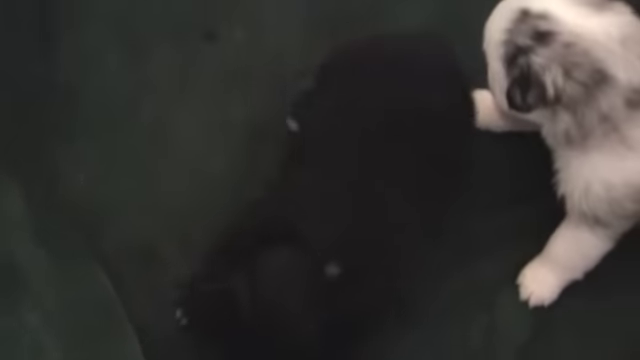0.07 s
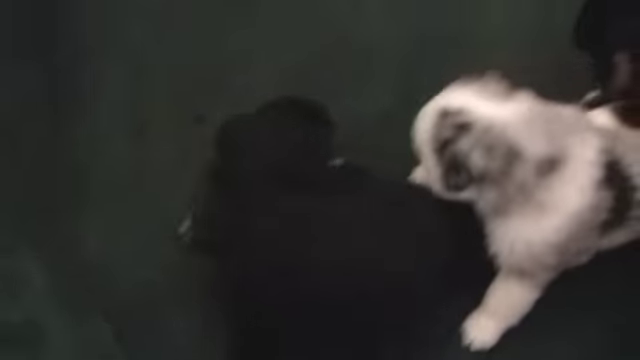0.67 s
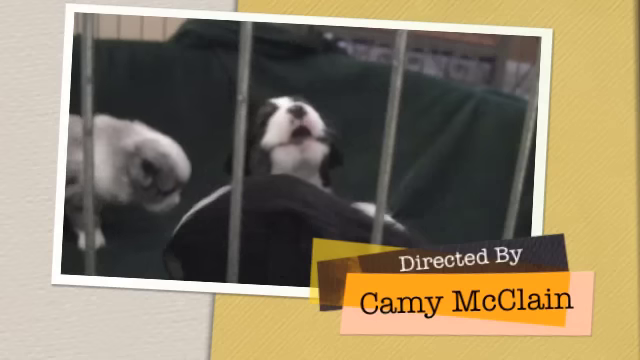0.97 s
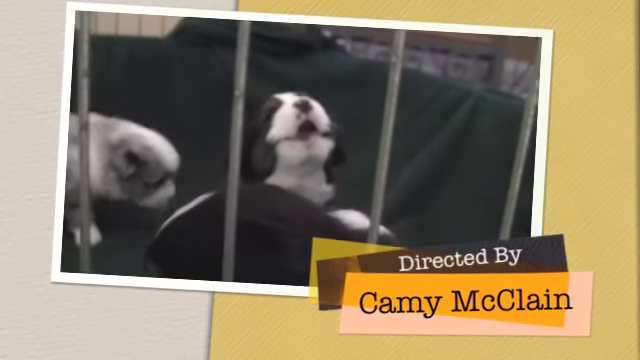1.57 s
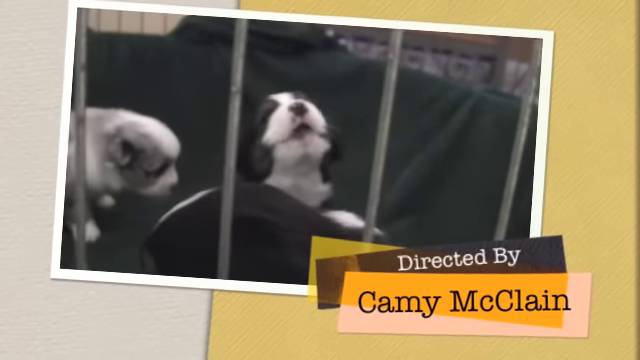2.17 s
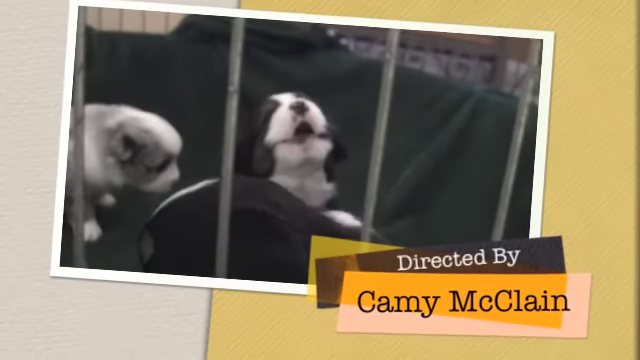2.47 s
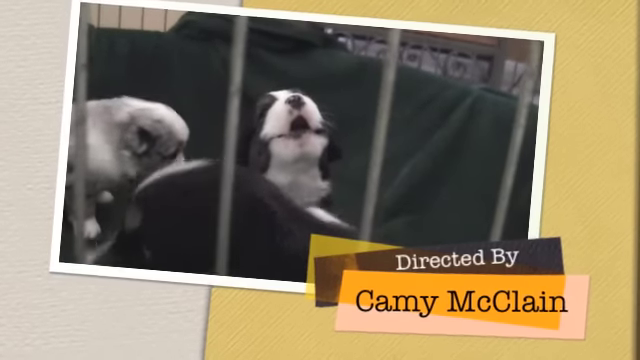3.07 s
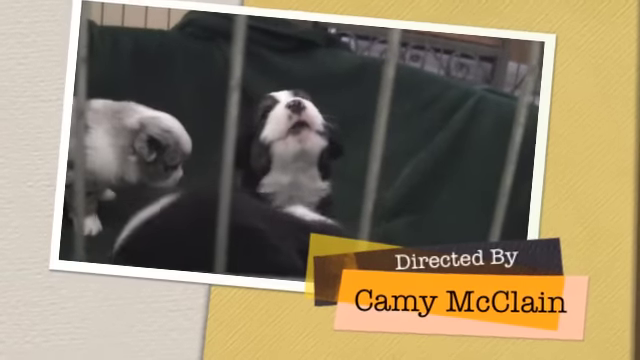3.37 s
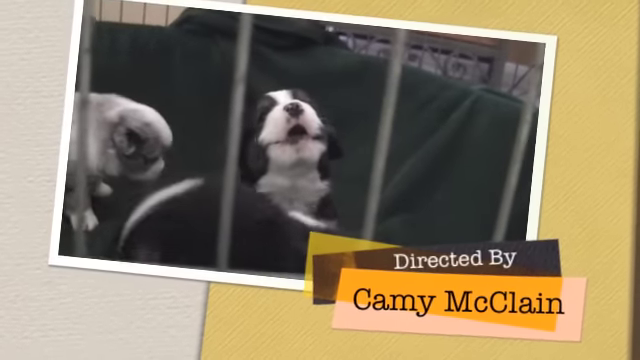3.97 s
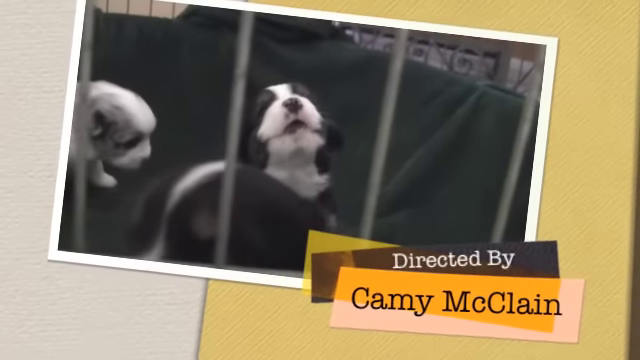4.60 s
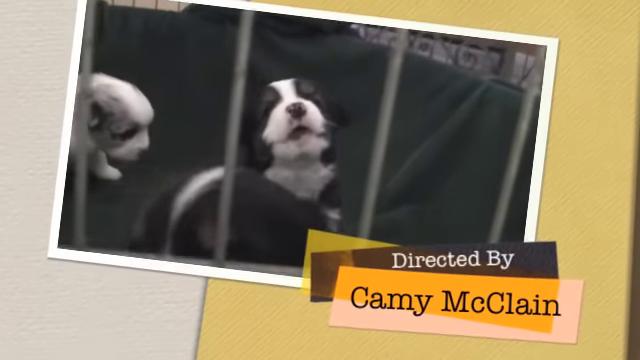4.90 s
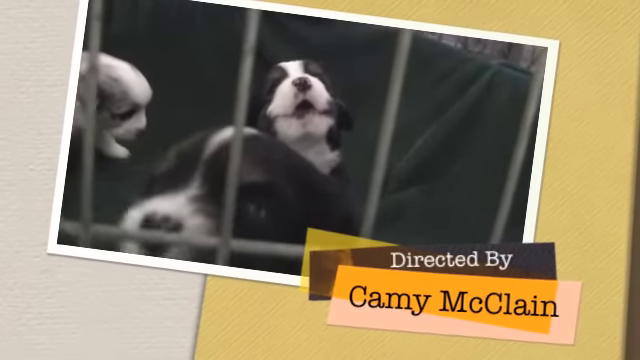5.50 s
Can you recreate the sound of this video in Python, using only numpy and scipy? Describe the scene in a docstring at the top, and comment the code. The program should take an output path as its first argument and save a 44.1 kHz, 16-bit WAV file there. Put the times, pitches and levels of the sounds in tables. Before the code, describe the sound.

Two puppies cry close to the microphone in a quiet indoor pen. A brief hush gives way to a breathy whimper, then one puppy lets out four howls, each a raspy yelp that breaks upward into a clear, high note. The second puppy overlaps with three thin, wavering whines. Paws pad and scuff lightly now and then, and the near walls add a short echo over faint room noise.

```python
"""A small indoor pen: two puppies cry after a second of near silence.
One whimpers, then howls four times: a rough yelp, a climb in the low register, a crack, a high wail.
Its vocal fold harmonics pass the throat and a mouth resonance that moves with the jaw.
A littermate whines along on a thin, almost pure tone. Paws scuff; the walls answer with a short ring."""
import sys
import numpy as np
from scipy import signal
from scipy.fft import rfft, irfft
from scipy.io import wavfile
from scipy.ndimage import uniform_filter1d, minimum_filter1d

SR = 44100
rng = np.random.default_rng(int(sys.argv[2]) if len(sys.argv) > 2 else 0)


def wrap_up_sound(samples):
    """Save the sound to the file named by the first command line argument, as 16-bit audio."""
    columns = np.atleast_2d(samples).T
    # keep every value between -1 and 1, then stretch to whole-number steps
    tamed = np.clip(columns, -1, 1)
    steps = np.round(tamed * 32767).astype(np.int16)
    wavfile.write(sys.argv[1], SR, steps)


N = 248928
TIME_S = np.arange(N) / SR


def amp(db):
    """Decibels to gain."""
    return 10 ** (np.asarray(db) / 20)


def unit_rms(x):
    """Scales to rms 1."""
    return x / np.sqrt(np.mean(x ** 2) + 1e-20)


def at_hz(points, hz):
    """Interpolates a table on a log-frequency axis."""
    point_hz, value = np.transpose(points)
    return np.interp(np.log(hz + 1), np.log(point_hz + 1), value)


def curves(rows):
    """Sample times of a table, then each column at those times."""
    times_s, *columns = np.transpose(rows)
    t = np.arange(times_s[0], times_s[-1], 1 / SR)
    return [t] + [np.interp(t, times_s, column) for column in columns]


def add(mix, start_s, sound):
    """Mixes a sound in at start_s."""
    part = mix[max(round(start_s * SR), 0):][:len(sound)]
    part += sound[:len(part)]


def noise(spectrum, size):
    """Shaped noise of rms 1."""
    gain = amp(at_hz(spectrum, np.fft.rfftfreq(size, 1 / SR)))
    return unit_rms(irfft(rfft(rng.standard_normal(size)) * gain, size))


def waver(corner_hz, size):
    """Low-passed random motion of rms 1."""
    hz = np.fft.rfftfreq(size, 1 / SR)
    gain = (hz > 0) / (1 + (hz / corner_hz) ** 2) ** 2
    return unit_rms(irfft(rfft(rng.standard_normal(size)) * gain, size))


def fade(t, rise_s, fall_s):
    """Linear fade in and out."""
    return np.clip((t - t[0]) / rise_s, 0, 1) * np.clip((t[-1] - t) / fall_s, 0, 1)


# Room noise before, then during the crying. Each row: frequency in Hz, relative level in dB.
HUSH_SPECTRUM = [(30, -28), (120, -4.5), (300, -6.5), (1000, -11), (8000, -27.5), (15000, -45.5)]
AIR_SPECTRUM = [(25, -14), (60, -12), (150, -5), (300, -5), (600, -7.5), (1200, -1.5), (2500, -14.5),
                (4500, -21.5), (8000, -25), (15000, -35)]

def room_noise(hush_db=-70, air_db=-49.5, air_start_s=1, width=0.3):
    """A hush gives way to louder room noise as the crying starts."""
    def stereo(spectrum):
        return noise(spectrum, N) + width * np.array([[1], [-1]]) * noise(spectrum, N)
    hush = amp(hush_db) * stereo(HUSH_SPECTRUM) * np.interp(TIME_S, [0.9, 0.97], [1, 0.1])
    air = amp(air_db) * stereo(AIR_SPECTRUM) * np.clip((TIME_S - air_start_s) / 0.0059, 0, 1)
    return hush + air


# Opening hum. Each row: time in seconds, pitch in Hz, level in dB.
HUM_CONTOUR = [(0, 136, -66), (.12, 133, -63), (.21, 131.8, -67), (.45, 124, -84), (.55, 110.3, -76),
               (.94, 103.5, -73)]

def hum(octave_db=-13.5):
    """A faint low tone and its octave, stepping down in pitch."""
    t, hz, level_db = curves(HUM_CONTOUR)
    phase = 2 * np.pi * np.cumsum(hz) / SR
    tone = np.sin(phase) + amp(octave_db) * np.sin(2 * phase)
    track = np.zeros(N)
    add(track, t[0], np.sqrt(2) * amp(level_db) * tone)
    return track


# Ring of the room. Each row: frequency in Hz, T60 in seconds.
WALL_T60 = [(200, 0.52), (1200, 0.22), (3000, 0.36), (8000, 0.33)]

def wall_reflections(x, wet_db=-14, gap_s=0.0043):
    """Dense reflections from the near walls, the bass lasting longest."""
    t = np.arange(SR // 2) / SR
    taps = rng.standard_normal((2, len(t))) * (rng.random((2, len(t))) < 0.1) * (t > gap_s)
    taps = taps + 0.5 * taps[::-1]  # closely spaced microphones
    hz, age_s, frames = signal.stft(taps, SR, nperseg=256)
    decay = amp(-60 * age_s / at_hz(WALL_T60, hz)[:, None])
    tail = signal.istft(frames * decay, SR, nperseg=256)[1]
    tail /= np.sqrt(np.mean(abs(rfft(tail, SR)[:, 800:2000]) ** 2))  # unity gain over 800-2000 Hz
    return amp(wet_db) * signal.fftconvolve(x[None], tail, axes=1)[:, :N]


# Stereo balance. Each row: frequency in Hz, left minus right in dB.
BALANCE = [(600, 1.3), (1200, 0.5), (2000, 4.5), (3100, 0.5), (6400, 3), (9000, 6.5), (13000, -5.5)]
# Stereo phase. Each row: frequency in Hz, left lead in radians.
PHASE_LEAD = [(0, 0), (1200, 0.42), (3000, 1.21), (6400, 1.12), (9000, 1.3)]

def direct_path(x):
    """The straight path reaches two microphones at unequal level and phase."""
    hz = np.fft.rfftfreq(N, 1 / SR)
    left = amp(at_hz(BALANCE, hz) / 2) * np.exp(0.5j * at_hz(PHASE_LEAD, hz))
    pair = np.array([left, 1 / left])
    return irfft(rfft(x) * pair / abs(pair).mean(0), N)


# Steps and scuffs. Each row: start in seconds, level in dB, centre in Hz, decay in seconds.
PAW_STEPS = [(1.291, -42, 147.2, 0.095), (3.387, -26, 1723, 0.0049), (4.697, -31.5, 1516, 0.0036),
             (4.706, -42, 2170, 0.025), (5.33, -48, 216, 0.052)]

def paw(start_s, level_db, hz, decay_s):
    """A short noise burst: low for a padding step, high for a scuffing claw."""
    t = np.arange(SR // 3) / SR
    spectrum = [(hz / 3, -25), (hz, 0), (hz * 1.2, -5), (hz * 2, -28), (hz * 10, -70)]
    envelope = np.exp(-t / decay_s) * fade(t, 5 / hz, 0.01)
    return start_s, amp(level_db) * noise(spectrum, len(t)) * envelope


# Breath noise. Each row: frequency in Hz, relative level in dB.
BREATH_SPECTRUM = [(150, -28), (420, -4), (700, -8.5), (1300, 6.5), (2000, -14.5), (3200, -10.5),
                   (4300, -31), (6500, -17), (9000, -20), (15000, -38.5)]
# Breaths before the first two howls. Each row: start in seconds, length in seconds, level in dB.
GASP_EVENTS = [(1.026, 0.099, -28.5), (2.201, 0.098, -42)]

def gasp(start_s, length_s, level_db):
    """A quick rush of air through the open mouth."""
    progress = np.arange(round(length_s * SR)) / (length_s * SR)
    envelope = np.interp(progress, [0, 0.25, 1], [0, 1.3, 0.15])
    return start_s, amp(level_db) * noise(BREATH_SPECTRUM, len(progress)) * envelope


# The littermate's three whines. Each row: time in seconds, pitch in Hz, level in dB.
FIRST_WHINE = [(1.712, 926, -29), (1.76, 1007, -28.5), (1.937, 1114, -25), (2.01, 1143, -28),
               (2.059, 1066, -21), (2.144, 1063, -25), (2.172, 918, -36.5)]
SECOND_WHINE = [(2.41, 843, -32.5), (2.59, 1383, -23.5), (2.782, 1540, -23), (3.072, 1467, -13),
                (3.127, 1505, -16), (3.3, 1425, -20), (3.352, 1455, -19), (3.393, 1494, -13.5),
                (3.546, 1472, -8.5), (3.619, 1468, -23), (3.722, 1345, -24.5), (3.865, 1456, -20),
                (3.96, 1352, -37), (4.289, 1038, -37.5)]
THIRD_WHINE = [(4.819, 390.5, -35), (4.85, 413, -34), (4.89, 639.5, -18), (4.955, 1095, -20),
               (5.01, 1299, -17.5), (5.218, 1355, -18), (5.316, 1389, -22.5), (5.377, 1400, -25),
               (5.468, 914, -23.5), (5.559, 619, -29), (5.605, 716, -31)]
# Whine overtones. Each row: frequency in Hz, level in dB re the fundamental.
WHINE_SPECTRUM = [(1200, -6.5), (1900, -12), (2300, -26), (2750, -30), (3050, -36.5), (3450, -29.5),
                  (3900, -55), (6000, -38.5), (7400, -35.5), (8900, -35), (10300, -55.5), (14000, -60)]
# Push through the nose. Each row: time in seconds, treble and hiss gain in dB.
NASALITY = [(3.25, -7), (3.37, 0), (3.53, 2.5), (3.7, -22.5), (4.9, -8.5), (5.1, -2), (5.4, -5)]
# Nose hiss. Each row: frequency in Hz, relative level in dB.
NOSE_SPECTRUM = [(3000, -31), (5500, -12), (7500, -10), (9000, -5), (10000, -23), (15000, -35.5)]

def whine(contour, tremor=0.0037, hiss_db=-42):
    """A strong fundamental with thin overtones and a hiss from the nose."""
    t, hz, level_db = curves(contour)
    nasal_db = np.interp(t, *np.transpose(NASALITY))
    catch = 0.08 * np.exp(-hz / 415) * waver(40, len(t))  # the pitch catches when low
    unsteady_hz = hz * (1 + catch + tremor * waver(48, len(t)))
    phase = 2 * np.pi * np.cumsum(unsteady_hz) / SR
    order = np.arange(2, 7)[:, None]
    gains = amp(at_hz(WHINE_SPECTRUM, order * hz) + nasal_db * (order * hz > 4000))
    tone = np.cos(phase) + (gains * np.cos(order * phase)).sum(0)
    hiss = amp(hiss_db + nasal_db) * noise(NOSE_SPECTRUM, len(t))
    return t[0], np.sqrt(2) * amp(level_db) * (tone + hiss) * fade(t, 0.0028, 0.0074)


# The howler's unsteady pitch. Each row: time in seconds, offset in percent.
PITCH_DRIFT = [(1.53, .5), (1.61, -.8), (1.8, -0.43), (1.878, 1.5), (1.958, -0.5), (3.0, 0.54),
               (3.056, -1.6), (3.196, 0.5), (3.55, -0.5), (3.751, 0), (3.817, -3.1), (3.932, 3),
               (4.018, -1), (4.205, 0.3), (4.307, -0.5), (4.406, 1), (4.45, 0)]

def voice(t, hz, level_db, mouth_hz, bright_db, edge_db, roughness, throat,
          attack_s=0.0014, mouth_width_hz=180, flutter=0.059, rasp_db=-10, breath_db=-20):
    """The howler's vocal fold harmonics, filtered by the throat and one mouth resonance."""
    size = len(t)
    hz = hz * (1 + np.interp(t, *np.transpose(PITCH_DRIFT)) / 100)
    level_db = level_db + 13 * roughness * waver(24, size)
    jitter = 0.074 * roughness * waver(130, size)
    tremor = 0.0037 * waver(90, size)
    phase = 2 * np.pi * np.cumsum(hz * (1 + jitter + tremor)) / SR
    order = np.arange(1, 29)[:, None]
    harmonic_hz = order * hz
    # Vocal effort sets the overtones: brightness from 1.4 kHz up, edge from 4 kHz up.
    effort_db = bright_db * np.interp(harmonic_hz, [1400, 3000], [0, 1])
    effort_db += edge_db * np.interp(harmonic_hz, [4000, 5500], [0, 1])
    detuning = (harmonic_hz - mouth_hz) / mouth_width_hz
    gains = amp(at_hz(throat, harmonic_hz) + effort_db) / np.hypot(1, detuning) * (harmonic_hz < 13600)
    gains /= np.sqrt((gains ** 2).sum(0) / 2)
    gains *= 1 + flutter * np.minimum(order - 1, 6) * waver(35, size)
    # Resonances delay the harmonics unequally, so each closure rings rather than clicks.
    lag_rad = np.arctan(detuning) + np.pi * np.interp(harmonic_hz, [2400, 3600, 7000], [0, 2, 4])
    harmonics = gains * np.exp(1j * (order * phase - lag_rad))
    # Uneven closures smear each harmonic into a band of rasp.
    rasp = np.array([waver(270, size) + 1j * waver(300, size) for _ in order])
    tone = (harmonics * (1 + amp(rasp_db) * roughness * rasp)).real.sum(0)
    tone *= 1 + roughness * waver(270, size)  # shimmer
    breath = amp(breath_db) * roughness * noise(BREATH_SPECTRUM, size)
    return t[0], amp(level_db) * (tone + breath) * fade(t, attack_s, 0.0017)


# Throat response in the low register. Each row: frequency in Hz, gain in dB.
LOW_REGISTER = [(300, -4), (600, -8), (1100, 2), (1700, -4.5), (2200, -17), (2800, -3.5), (3350, -10.5),
                (3850, -21), (4700, -35), (5700, -23), (6400, -10.5), (7400, -35.5), (9500, -41.5),
                (13000, -46.5)]
# Opening whimper. Each row: time in seconds, pitch in Hz, level in dB, mouth resonance in Hz,
# brightness in dB, edge in dB, roughness from 0 to 1.
WHIMPER_CONTOUR = [(.998, 539, -28, 505, -18.5, -11, 0.09), (1.06, 503.8, -27, 434, -22.5, -10, 0.18),
                   (1.162, 487.6, -30.5, 434, -29, -15, 0.36)]

def whimper():
    """A hoarse, breathy cry through a narrow mouth resonance."""
    return voice(*curves(WHIMPER_CONTOUR), LOW_REGISTER, mouth_width_hz=79, rasp_db=5, breath_db=-16.5)


# Howl openings. Each row: start, end, attack and scoop in seconds; start, top, dip and goal pitch
# in Hz; climb time constant in seconds; level, brightness, edge and gradual treble shift in dB.
HOWL_YELPS = [(1.152, 1.523, 0.017, 0.051, 326.8, 570.4, 501, 716, 0.1, -9, -4.5, 13.5, 22),
              (2.337, 2.579, 0.011, 0.047, 349, 594.7, 529, 1019, 0.29, -10, -0.5, 10, -10),
              (3.528, 4.419, 0.0079, .047, 314.1, 597.4, 461.8, 618.6, .129, -10.5, -1.5, 8.5, -21),
              (5.13, 5.316, .055, 0.1, 191.9, 532, 547.6, 1494, 0.35, -8, -6, 8, -17.5)]

def yelp(start_s, end_s, attack_s, scoop_s, start_hz, top_hz, dip_hz, goal_hz, climb_s,
         level_db, bright_db, edge_db, shift_db, dip_s=0.118):
    """Low register: the pitch scoops up, the push slackens, then the pitch climbs until the crack."""
    age_s = np.arange(0, end_s - start_s, 1 / SR)
    scoop = np.sin(np.pi / 2 * np.minimum(age_s / scoop_s, 1))
    slack = np.sin(np.pi / 2 * np.interp(age_s, [scoop_s, dip_s], [0, 1])) ** 2
    climb = 1 - np.exp(-np.maximum(age_s - dip_s, 0) / climb_s)
    hz = start_hz + (top_hz - start_hz) * scoop + (dip_hz - top_hz) * slack + (goal_hz - dip_hz) * climb
    # The jaw snaps open, then closes.
    onset_hz, open_hz, rest_hz = 1240, 2052, 1274
    closing = 1 - np.exp(-np.maximum(age_s - scoop_s, 0) / 0.047)
    mouth_hz = onset_hz + (open_hz - onset_hz) * scoop + (rest_hz - open_hz) * closing
    dip_db = -7.5 * np.exp(-((age_s - dip_s) / 0.051) ** 2)
    level_db = level_db + (1 - scoop) + dip_db
    treble_db = shift_db * (1 - np.exp(-(age_s / 0.61) ** 2))
    bright_db = bright_db - 7 * (1 - scoop) + treble_db
    edge_db = edge_db + 2.5 * (scoop - slack) - 0.69 * treble_db  # the top overtones shift less
    roughness = 0.018 + 0.25 * np.exp(-age_s / 0.085)
    return voice(start_s + age_s, hz, level_db, mouth_hz, bright_db, edge_db, roughness,
                 LOW_REGISTER, attack_s)


# Crack noise. Each row: frequency in Hz, relative level in dB.
CRACK_SPECTRUM = [(200, -65.5), (700, 0.5), (1050, 5.5), (2800, -26), (4200, -43), (6400, -20),
                  (12000, -58)]
# Register breaks. Each row: start in seconds, level in dB, swell length in seconds
# (the crack is loudest halfway through).
HOWL_CRACKS = [(1.523, -17, 0.0092), (2.578, -16, 0.0069), (4.418, -22.5, 0.0075), (5.297, -18, 0.016)]

def crack(start_s, level_db, swell_s):
    """The folds flap at random for a few cycles as the register changes."""
    t = np.arange(SR // 10) / SR
    envelope = t / swell_s * np.exp(2 - 2 * t / swell_s)
    return start_s, amp(level_db) * noise(CRACK_SPECTRUM, len(t)) * envelope


# Throat response in the high register. Each row: frequency in Hz, gain in dB.
HIGH_REGISTER = [(1050, 2.5), (2100, -6), (2600, -17), (3200, -0.5), (3500, -18), (4100, -43.5),
                 (5300, -23.5), (6400, -10), (7400, -28), (8600, -35), (13000, -41)]
# Held notes. Each row: start and end in seconds, pitch and overshoot in Hz, sag in Hz/s, final drop
# in Hz, level in dB, tiring in dB/s, mouth resonance in Hz, brightness and edge in dB.
HOWL_WAILS = [(1.525, 2.108, 1056, 89.5, 5.5, 237.2, -10.5, 5, 1360, -1.5, 16),
              (2.588, 3.303, 1087, 72.5, 97, 192.7, -10, 10, 1296, 4, 12.5),
              (4.42, 4.56, 983.6, -18, 18.5, 187.6, -11, 9, 1278, 2, 7),
              (5.304, 6.111, 1115, -86.5, -27, 200, -11, -9.5, 1730, -25.5, 24.5)]

def wail(start_s, end_s, pitch_hz, overshoot_hz, sag_hz_per_s, drop_hz, level_db, tiring_db_per_s,
         mouth_hz, bright_db, edge_db, settle_s=0.056, drop_s=0.072, release_s=0.055):
    """High register: a clear note settles, holds, then drops and crumbles as the air runs out."""
    age_s = np.arange(0, end_s - start_s, 1 / SR)
    left_s = end_s - start_s - age_s
    fresh, spent = np.exp(-age_s / settle_s), np.exp(-left_s / release_s)
    hz = pitch_hz + overshoot_hz * fresh - sag_hz_per_s * age_s - drop_hz * np.exp(-left_s / drop_s)
    level_db = level_db - tiring_db_per_s * age_s - 13.5 * spent
    bright_db = bright_db - 4 * fresh - 22.5 * spent ** 2
    roughness = 0.012 + 0.22 * spent
    return voice(start_s + age_s, hz, level_db, mouth_hz, bright_db, edge_db, roughness,
                 HIGH_REGISTER, flutter=0.049)


def scene():
    """Both puppies, direct and off the walls, over room noise and hum."""
    pen = np.zeros(N)
    add(pen, *whimper())
    for contour in (FIRST_WHINE, SECOND_WHINE, THIRD_WHINE):
        add(pen, *whine(contour))
    for source, table in ((yelp, HOWL_YELPS), (wail, HOWL_WAILS), (crack, HOWL_CRACKS),
                          (gasp, GASP_EVENTS), (paw, PAW_STEPS)):
        for row in table:
            add(pen, *source(*row))
    pen *= fade(TIME_S, 0.005, 0.005)
    return direct_path(pen) + wall_reflections(pen) + room_noise() + hum()


def record(dry, knee_db=-8.5, ratio=8.3, ceiling=0.85, cutoff_hz=15600):
    """Gain control evens out loud notes, a smooth limiter holds the peaks, a low-pass ends the band."""
    power = uniform_filter1d((dry ** 2).mean(0), size=900)
    power_db = 10 * np.log10(abs(power) + 1e-12)
    excess_db = uniform_filter1d(np.maximum(power_db - knee_db, 0), size=600)
    levelled = dry * amp(-excess_db * (1 - 1 / ratio))
    limiter_gain = np.minimum(1, ceiling / (abs(levelled).max(0) + 1e-9))
    held_gain = minimum_filter1d(limiter_gain, size=600)
    smooth_gain = uniform_filter1d(uniform_filter1d(held_gain, size=300), size=300)
    lowpass = signal.firwin(511, cutoff_hz, window=("kaiser", 9), fs=SR)
    return signal.oaconvolve(levelled * smooth_gain, lowpass[None], "same")


dry = scene()
out = record(dry)
wrap_up_sound(out)
```